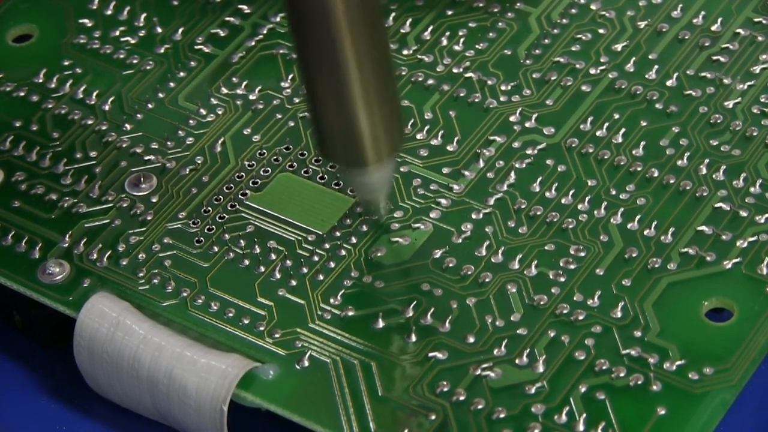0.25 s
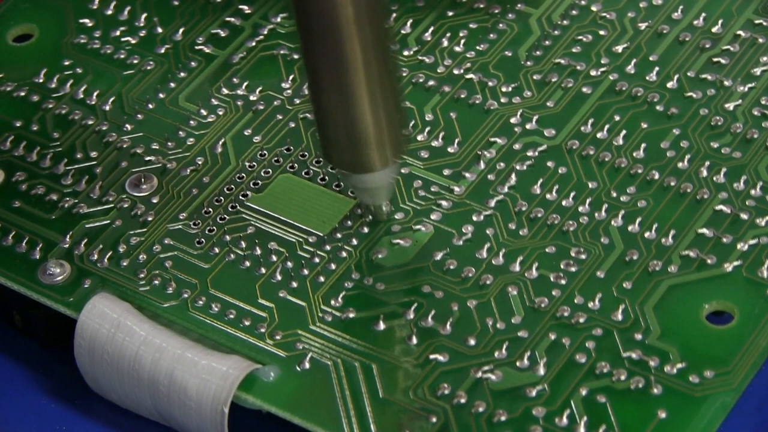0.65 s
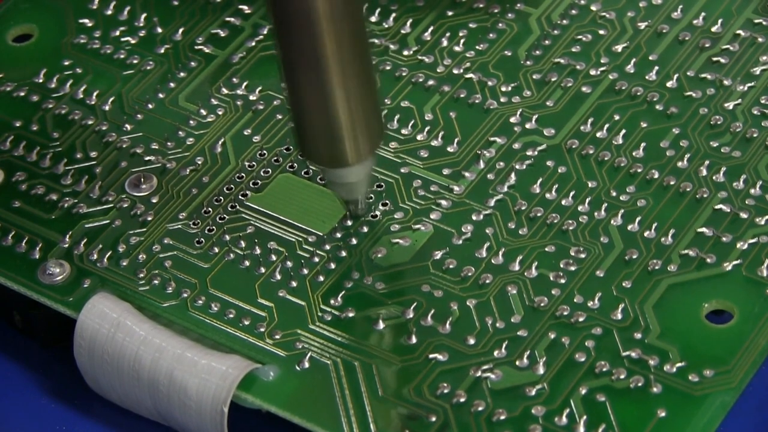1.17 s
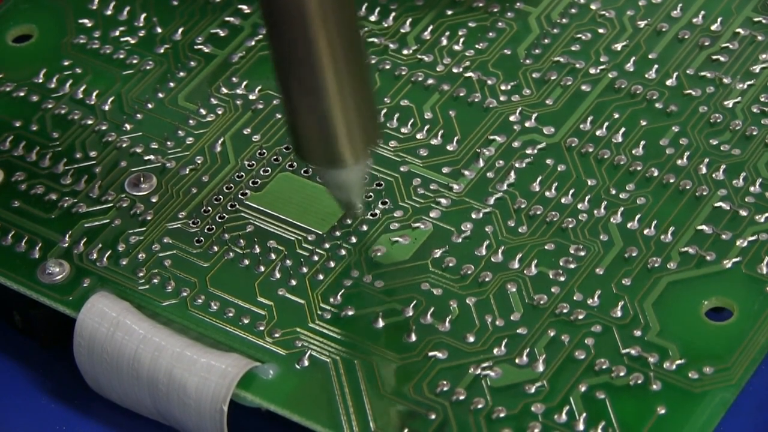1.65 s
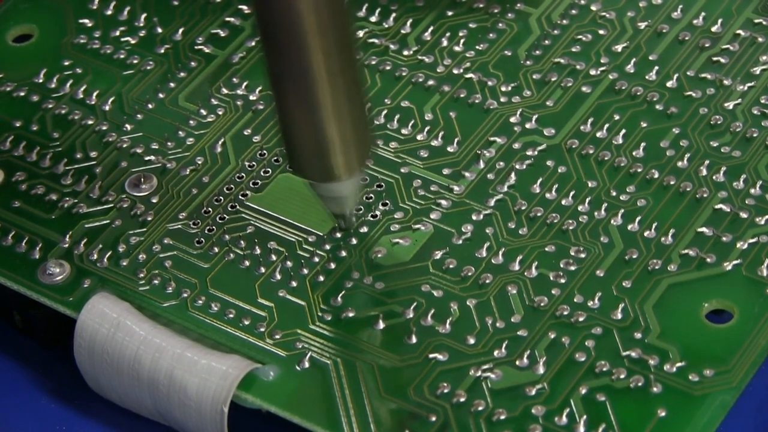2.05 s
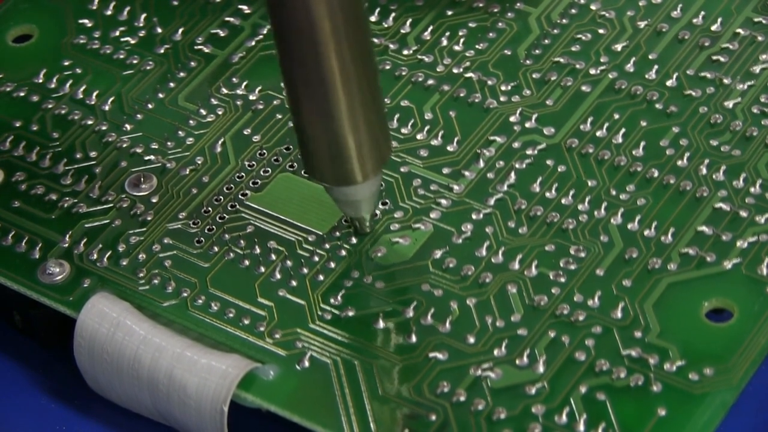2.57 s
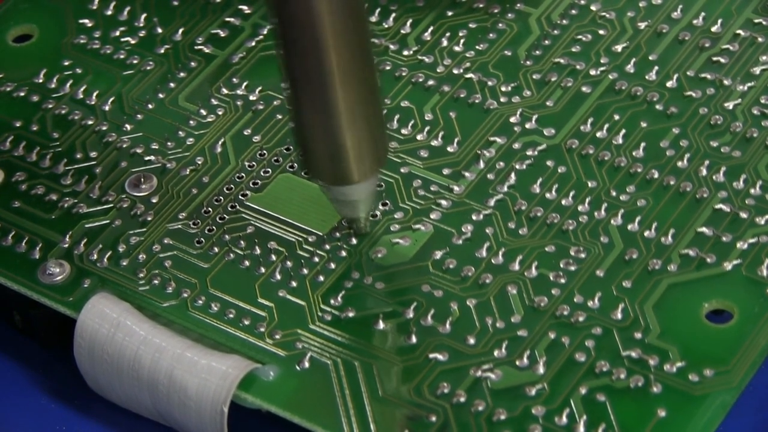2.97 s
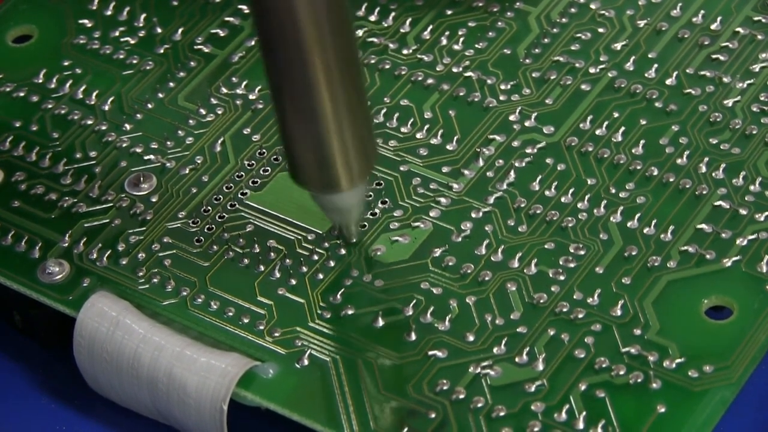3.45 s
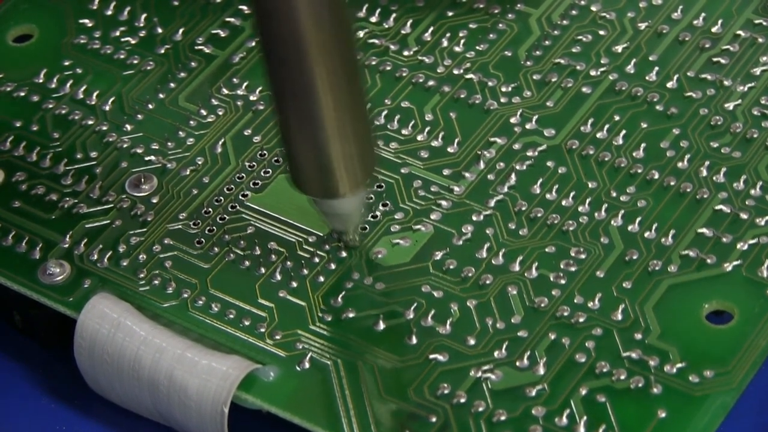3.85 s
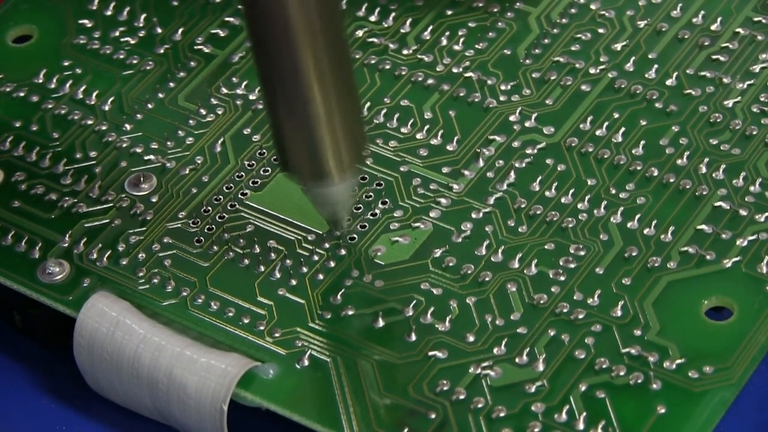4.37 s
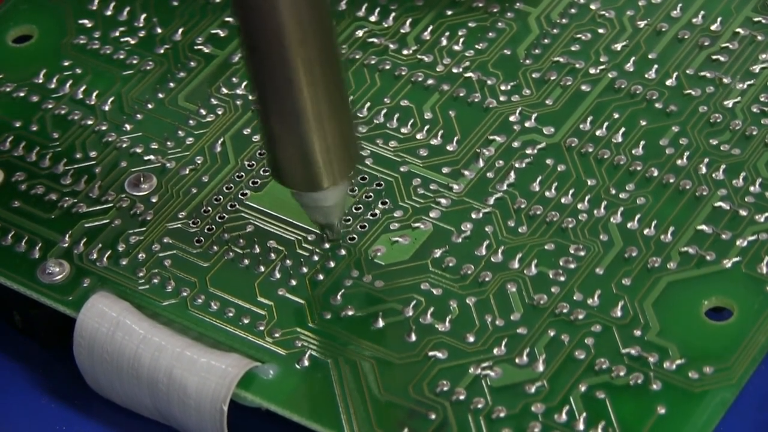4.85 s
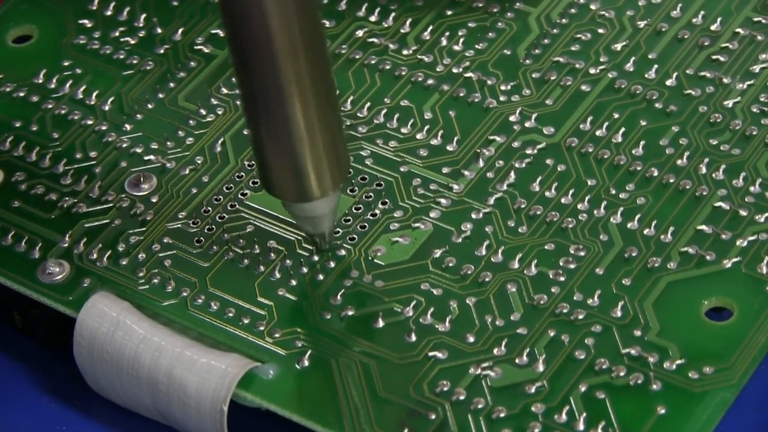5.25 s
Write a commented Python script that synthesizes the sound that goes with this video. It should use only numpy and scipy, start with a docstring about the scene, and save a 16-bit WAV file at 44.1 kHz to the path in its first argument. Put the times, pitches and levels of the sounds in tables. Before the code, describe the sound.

A close, nearly dry recording at a quiet workbench: low, soft room tone, a barely perceptible high electronic whine and a very short bench echo. A desoldering gun is triggered seven times, at about 0.07, 0.8, 1.5, 2.2, 3.2, 4.1 and 4.9 seconds. Each pull starts with a crisp plastic double click; a small pump spins up quickly into a rough buzz of about 70 hertz with hard, ringing valve clatter and hissing air, lasting 0.1 to 0.16 seconds. It stops abruptly, usually with a duller release knock. Solder slurps in bright, sputtering spurts, strongest around 1.6, 2.3 and 5.0 seconds, very faint at 4.2 and absent from the fifth burst. Between bursts the tip makes tiny ticks, taps and scuffs on pins and board, clearest at 1.77, 3.5 and 4.6 seconds, with faint hand rustles. After 5.0 seconds only small touches remain.

```python
"""On a quiet workbench, a desoldering gun is triggered seven times over a circuit board.
Each pull clicks the switch and spins up a small diaphragm pump: shaft orders make its drone, slaps ringing
its housing make the valve clatter, and shaped noise makes the hiss of air and the slurp of molten solder.
The tip ticks against pins and board as struck modes and scuffs as noise; the hand rustles on the gun.
A short bench echo, room tone and a faint electronic whine surround it all."""
import sys
import numpy as np
from scipy import signal
from scipy.fft import rfft, irfft, next_fast_len
from scipy.io import wavfile

SR = 44100
rng = np.random.default_rng(int(sys.argv[2]) if len(sys.argv) > 2 else 0)


def dump_mix(stems):
    """Bounce the given channels to the path in sys.argv[1] as a 16-bit WAV at rate SR."""
    frames = np.atleast_2d(stems).T  # one column per channel
    limited = np.clip(frames, -1, 1)  # hard clip at full scale
    pcm = np.round(limited * 32767).astype(np.int16)
    wavfile.write(sys.argv[1], SR, pcm)


N = 243431
TIME = np.arange(N) / SR
TINY = 1e-18   # keeps the recursive filters out of denormal numbers


def from_db(db):
    """Decibels to gain."""
    return 10 ** (np.asarray(db) / 20)


def rms_one(x):
    """Scale to rms 1."""
    return x / np.sqrt(np.mean(x ** 2) + 1e-20)


def noise(spectrum):
    """Steady noise of rms 1, coloured by rows of (Hz, relative dB per Hz)."""
    hz, db = np.transpose(spectrum)
    size = next_fast_len(N, real=True)
    bins = np.maximum(np.fft.rfftfreq(size, 1 / SR), 1)
    low_cut = np.minimum(bins / hz[0], 1) ** 2   # 12 dB per octave below the first row
    colour = low_cut * from_db(np.interp(np.log(bins), np.log(hz), db))
    white = rng.standard_normal(size)
    return rms_one(irfft(rfft(white) * colour, size)[:N])


def drift(rate):
    """Straight lines between `rate` random values a second, each of spread 1."""
    knots = rng.standard_normal(N)
    return np.interp(TIME * rate, np.arange(N), knots)


def swells(rows):
    """A bell-shaped rise and fall for each row (middle s, half length s, dB)."""
    level = np.zeros(N)
    for middle, half, db in rows:
        level += from_db(db) * np.exp(-np.minimum(((TIME - middle) / half) ** 2 / 2, 20))
    return level


def ring(force, hz, t60):
    """One mode: a unit click sets a dying sine of height 1 ringing."""
    r, w = from_db(-60 / (t60 * SR)), 2 * np.pi * hz / SR
    return signal.lfilter([0, np.sin(w)], [1, -2 * r * np.cos(w), r * r], force + TINY)


def resonate(x, hz, width):
    """A resonance `width` Hz wide with gain 1 on top."""
    r = np.exp(-np.pi * width / SR)
    feedback = [1, -2 * r * np.cos(2 * np.pi * hz / SR), r * r]
    return signal.lfilter(np.array([1, 0, -1]) * (1 - r * r) / 2, feedback, x + TINY)


def contact(touches, grit, click=1, size=6000):
    """Each touch (s, dB, length s, share of the second way) is a click and dying friction, struck in two ways."""
    forces = np.zeros((2, N + size))
    friction = grit * rng.standard_normal(N + size)
    for s, db, length, share in touches:
        at = int(s * SR)
        share = np.clip(share, 0, 1)
        force = friction[at:at + size] * np.exp(-np.arange(size) / (length * SR))
        force[0] += click
        forces[:, at:at + size] += from_db(db) * np.outer([1 - share, share], force)
    return forces[:, :N]


def room_tone(level_db=-64):
    """The quiet room: steady low-heavy noise."""
    # Room colour. Each row: frequency in Hz, relative level in dB per Hz.
    room_colour = [(25, -19), (45, -12), (100, -4), (150, -4.5), (188, 0), (250, -8), (355, -8.5),
                   (570, -18), (950, -24), (1200, -28.5), (1850, -30), (2300, -33), (7800, -41),
                   (15800, -45)]
    return from_db(level_db) * noise(room_colour)


def electronic_whine(hz=7930, rms_db=-100):
    """A faint steady sine."""
    return from_db(rms_db) * np.sqrt(2) * np.sin(2 * np.pi * hz * TIME)


def handling(per_s=7, level_db=-79, fade_s=0.0093):
    """The hand shifts on the gun: noise rustles start at random and die exponentially."""
    shifts = (rng.random(N) < per_s / SR) * rng.uniform(.5, 1.5, N)
    rustle = signal.lfilter([1], [1, -np.exp(-1 / (fade_s * SR))], shifts + TINY)
    return from_db(level_db) * rustle * noise([(800, 9), (2000, -7), (4500, -3.5), (9000, -16), (15000, -23)])


def tip_touches(bump_flex=.75, catch_lead_s=.015, catch_db=-8.5, catch_scrape_s=0.0099, graze_lag_s=0.022,
                graze_db=-22.5, nudges_per_s=3, nudge_db=-65, nudge_spread_db=2, nudge_scrape_s=0.014):
    """Every contact of the tip as (s, dB, scrape length s, share that flexes the board)."""
    # The tip slips off a pin. Each row: start in seconds, level in dB, scrape length in seconds.
    flick_rows = [(0.394, -55, 0.018), (1.772, -44.5, 0.002), (2.5954, -55.5, 0.0035), (3.509, -48, 0.009),
                  (4.5763, -50.5, 0.011), (4.608, -49.5, 0.005), (5.185, -54, 0.0027)]
    # The tip is set down and flexes the board. Each row: start in seconds, level in dB, scrape length in seconds.
    bump_rows = [(0.294, -61, .008), (0.318, -64, 0.0055), (0.482, -66, .02), (0.704, -61, 0.0022),
                 (1.023, -66.5, 0.023), (2.528, -63, 0.0077), (2.862, -62, .005), (3.748, -65, 0.0052),
                 (4.536, -63, .02), (4.738, -67, .005), (5.389, -63, .004)]
    touches = [(s, db, scrape, bump_flex) for s, db, scrape in bump_rows]
    # the tip catches on the pin before each flick and grazes it after; levels relative to the flick
    for s, db, scrape in flick_rows:
        touches.append((s - catch_lead_s, db + catch_db, catch_scrape_s, 0))
        touches.append((s, db, scrape, 0))
        touches.append((s + graze_lag_s, db + graze_db, scrape, 0))
    # lighter nudges at random, on pin and board, as the tip feels for the next joint
    chance, strength, flex = rng.random((3, N))
    for i in np.flatnonzero(chance < nudges_per_s / SR):
        db = nudge_db + nudge_spread_db * (2 * strength[i] - 1)
        touches.append((TIME[i], db, nudge_scrape_s, bump_flex * flex[i]))
    return touches


def tip(grit=0.048, low_hz=750, soft_hz=7000):
    """The tip strikes pins and board, ringing the board's modes, and scuffs over the joints."""
    # Tip and board modes. Each row: frequency in Hz, 60 dB decay in seconds,
    # level in dB when the tip is flicked, level in dB when the board flexes.
    board_modes = [(870, 0.017, -43, -20), (999, 0.022, -16, 8.5), (1418, 0.017, 1.5, -16),
                   (1567, 0.0089, -5, -31), (1840, 0.021, -10, 1), (2770, 0.011, -17.5, -3),
                   (4160, 0.0054, -17, -5), (5360, 0.0055, -17, -12), (6770, 0.0069, -24, -13)]
    # Dry little scuffs on the solder. Each row: middle in seconds, half length in seconds, level in dB.
    scuff_rows = [(0.02, 0.014, -69.5), (.495, 0.0089, -72.5), (.688, .006, -71), (1.266, 0.0051, -67.5),
                  (1.995, 0.047, -73.5), (2.888, 0.0082, -67), (3.04, .004, -69), (4.437, 0.0061, -65)]
    flicks, flexes = contact(tip_touches(), grit)
    ticks = np.zeros(N)
    for hz, t60, flick_db, flex_db in board_modes:
        ticks += ring(from_db(flick_db) * flicks + from_db(flex_db) * flexes, hz, t60)
    # soft solder takes the edge off each contact, and the small board radiates little bass
    ticks = signal.sosfilt(signal.butter(2, [low_hz, soft_hz], "band", fs=SR, output="sos"), ticks)
    scuffs = swells(scuff_rows) * noise([(1000, 12.0), (3500, 0.5), (8000, -9), (15000, -17)])
    return ticks + scuffs


def trigger(rattle_s=0.0021, grit=0.16, click=0.78, second_click_s=.016, bounce_s=.0026, bounce_db=-10,
            bounce_dull=0.8, release_dull=0.72):
    """The switch rings the handle: two bright clicks with duller bounces when pressed, dull knocks when let go."""
    # The trigger is pressed. Each row: start in seconds, first click in dB, second click in dB.
    press_rows = [(0.0657, -36.5, -39), (.798, -35.5, -43), (1.5012, -34.5, -41), (2.188, -41.5, -36),
                  (3.182, -48, -35.5), (4.0745, -58.5, -34), (4.877, -43, -40.5)]
    # The trigger springs back against its stop. Each row: start in seconds, level in dB.
    release_rows = [(0.1659, -35.5), (0.181, -41), (0.9011, -30), (.914, -31), (1.6401, -38.5),
                    (3.3497, -32.5), (4.2112, -30.5), (5.007, -31)]
    # Switch and handle modes. Each row: frequency in Hz, 60 dB decay in seconds,
    # level in dB when snapped, level in dB when knocked.
    handle_modes = [(1970, 0.008, -11.5, 0.5), (3120, 0.0023, -5.5, 0), (4220, 0.0098, -20, -3.5),
                    (5190, 0.006, -12, -6), (6500, 0.0031, -10.5, -8), (7100, 0.0056, -9, -13.5),
                    (9600, 0.0011, -9.5, -11), (11000, 0.0018, -10.5, -8), (15200, 0.0027, -20, -18)]
    touches = [(s, db, rattle_s, release_dull) for s, db in release_rows]
    for pressed, first_db, second_db in press_rows:
        for s, db in ((pressed, first_db), (pressed + second_click_s, second_db)):
            touches.append((s, db, rattle_s, 0))
            touches.append((s + bounce_s, db + bounce_db, rattle_s, bounce_dull))
    snaps, knocks = contact(touches, grit, click)
    clicks = np.zeros(N)
    for k, (hz, t60, snap_db, knock_db) in enumerate(handle_modes):
        force = from_db(snap_db) * snaps + from_db(knock_db) * knocks
        clicks += (-1) ** k * ring(force, hz, t60)   # neighbouring modes move in opposite phase
    return clicks


def slurps(sputter_db=1.5, whistle_hz=14550, whistle_width_hz=1000, whistle_db=-4):
    """Solder and air tear through the nozzle: a sputtering noise rush with a thin edge whistle."""
    # Solder on the move. Each row: middle in seconds, half length in seconds, level in dB.
    slurp_rows = [(0.153, 0.02, -55), (0.858, 0.011, -50), (0.902, 0.012, -54.5), (1.587, 0.0063, -46),
                  (1.620, 0.017, -51.5), (2.272, 0.0086, -43.5), (2.342, 0.014, -46), (4.19, 0.025, -60),
                  (5.001, 0.012, -47)]
    # Nozzle colour. Each row: frequency in Hz, relative level in dB per Hz.
    rush_colour = [(1200, 20), (2200, 0), (4000, 8), (6000, 5), (8000, 10.5), (9500, 7.5), (11200, 9.5),
                   (13000, 5), (15500, -16)]
    rush = noise(rush_colour) * from_db(sputter_db * drift(600))
    whistle = rms_one(resonate(rng.standard_normal(N), whistle_hz, whistle_width_hz))
    return swells(slurp_rows) * (rush + from_db(whistle_db) * whistle)


def run_down(t, time_constant):
    """A decay that starts gently, as inertia carries the motor on."""
    return np.exp(1 - np.hypot(1, t / time_constant))


def pump(pump_hz=69.3, drone_db=-29, air_db=-43, speed_wobble=.002, start_slack=0.0689, scatter=0.9,
         second_valve=0.62, valve_gap=.42, rough=0.22, puff=0.1, shudder=0.062,
         intake_above_hz=650, intake_lead=0.2888, intake_play=0.039, order_lag=1.74,
         spin_up_s=0.055, run_down_s=0.0072, speed_lag_s=0.02227, coast_s=0.88,
         drone_down_s=0.0081, air_down_s=0.026):
    """The motor spins up at each pull; every turn draws air in, pushes it out and slaps two valves."""
    # Pump bursts. Each row: motor on in seconds, motor off in seconds, valve slap level in dB before the housing.
    burst_rows = [(0.069, 0.161, -47), (0.798, 0.906, -47.5), (1.501, 1.627, -46), (2.192, 2.355, -45),
                  (3.193, 3.342, -45.5), (4.085, 4.207, -47), (4.885, 5.002, -44)]
    # Drone orders. Each row: multiple of the shaft speed, relative level in dB.
    drone_orders = [(1, -17.5), (2, -9.5), (3, -3.5), (4, -7.5), (5, -10), (6, -6.5), (7, -2), (8, -3.5),
                    (9, -34), (10, -15.5), (11, -20), (12, -10.5), (13, -11), (14, -14.5), (15, -15.5),
                    (16, -22.5)]
    # Housing resonances rung by the valves. Each row: frequency in Hz, width in Hz, relative level in dB.
    housing_modes = [(1330, 81, 2), (1399, 150, -2), (1645, 120, -7), (2170, 33, 4), (2330, 125, -8),
                     (2640, 68, -10), (2820, 55, -4), (3270, 63, -12), (3668, 81, -1.5), (3675, 120, -16),
                     (4220, 180, -32), (4990, 200, -18.5)]
    # Colour of the air. Each row: frequency in Hz, relative level in dB per Hz.
    air_colour = [(110, 9), (450, 11), (950, 6), (1250, 4), (1850, -3), (2200, 3), (2900, -1.5),
                  (3300, -4.5), (3750, -1.5), (4400, -7), (5000, -8.5), (6700, -12.5), (9700, -17.5),
                  (15500, -14)]
    drone, slaps, air = np.zeros((3, N))
    waver = 1 + speed_wobble * drift(60)
    unevenness = 1 + rough * drift(300)
    load = 1 + shudder * drift(140)
    drone_rms = np.sqrt(sum(from_db(db) ** 2 for k, db in drone_orders) / 2)
    for on, off, slap_db in burst_rows:
        span = slice(int(on * SR), int((off + .12) * SR))   # leaves room to run down
        t = np.maximum(TIME[span] - on, 0)
        coasting = np.maximum(t - (off - on), 0)
        spin_up = np.sin(np.pi / 2 * np.minimum(t / spin_up_s, 1))
        effort = spin_up * run_down(coasting, run_down_s)
        strength = from_db(drone_db) / drone_rms * spin_up ** 2.3
        strength = strength * run_down(coasting, drone_down_s) * load[span]
        # the shaft starts a little slow, settles, and loses speed once switched off
        speed = pump_hz * waver[span] * (1 - start_slack * np.exp(-t / speed_lag_s))
        speed = speed * np.exp(-coasting / coast_s)
        turns = np.cumsum(speed) / SR
        # low orders make the exhaust stroke, higher ones an intake stroke a part of a turn before it
        intake = intake_lead + intake_play * rng.standard_normal()
        for k, db in drone_orders:
            stroke = turns + intake * (k * pump_hz > intake_above_hz)
            # the chamber delays higher orders (radians per unit of log order);
            # the load differs at every pull, so each order also lags a little differently
            lag = scatter * rng.standard_normal() - order_lag * np.log(k)
            drone[span] += from_db(db) * strength * np.cos(2 * np.pi * k * stroke + lag)
        for place, force in ((0, 1), (valve_gap, second_valve)):   # place in the turn, relative force
            since = ((turns - place + .5) % 1 - .5) * SR / pump_hz   # samples from the nearest slap
            slaps[span] += force * from_db(slap_db) * effort * np.sinc(since / 2) * unevenness[span]
        # air starts to flow before the diaphragm reaches full stroke, and puffs twice a turn
        flow = spin_up ** .65 * np.exp(-(coasting / air_down_s) ** 2.43)
        air[span] += from_db(air_db) * flow * (1 + puff * np.cos(4 * np.pi * turns))
    clatter = np.zeros(N)
    for k, (hz, width, db) in enumerate(housing_modes):
        clatter += (-1) ** k * from_db(db) * resonate(slaps, hz, width)
    return drone + from_db(36) * clatter + air * noise(air_colour)


def bench_echo(x, t60=0.033, low_hz=900, high_hz=6500, size=4000):
    """Close reflections from the bench and the things on it: a short decaying noise tail."""
    t = np.arange(size) / SR
    tail = rng.standard_normal(size) * from_db(-60 * t / t60) * (t > .003)   # first reflection after 3 ms
    tail = signal.sosfilt(signal.butter(2, [low_hz, high_hz], "band", fs=SR, output="sos"), tail)
    return signal.oaconvolve(x, tail / np.sqrt(np.sum(tail ** 2)))[:N]


def scene():
    """Gun and tip with their bench echo, over room tone and a faint electronic whine."""
    background = room_tone() + electronic_whine()
    touches = handling() + tip()
    gun = trigger() + slurps() + pump()
    close = touches + gun
    return (close + from_db(-16.5) * bench_echo(close) + background)[None]


def record(dry, cutoff_hz=15900):
    """A steep elliptic low-pass cuts the top."""
    return signal.sosfilt(signal.ellip(10, .3, 70, cutoff_hz, fs=SR, output="sos"), dry)


dry = scene()
out = record(dry)
dump_mix(out)
```